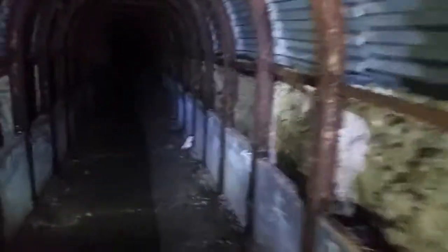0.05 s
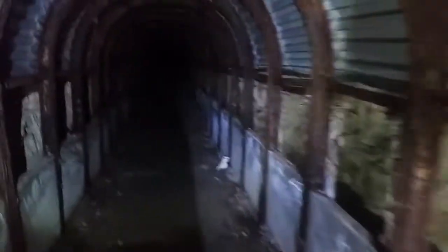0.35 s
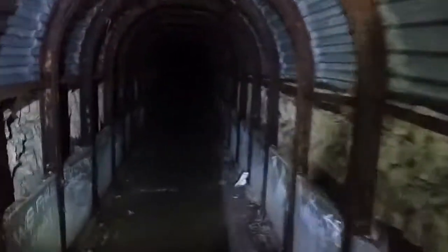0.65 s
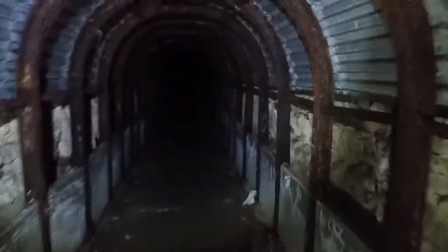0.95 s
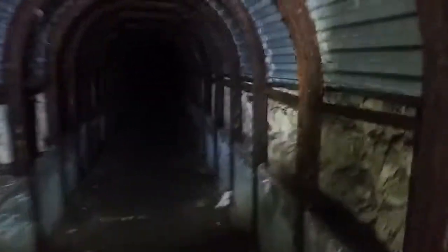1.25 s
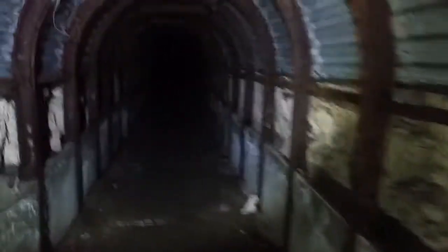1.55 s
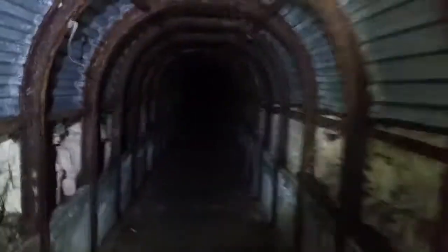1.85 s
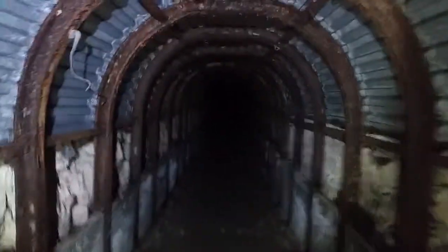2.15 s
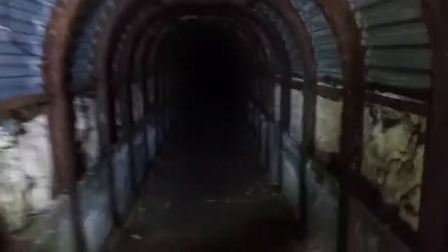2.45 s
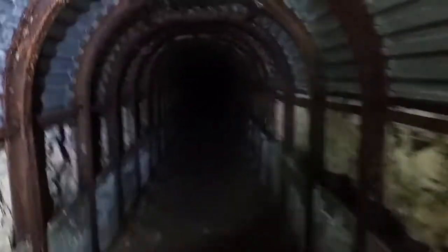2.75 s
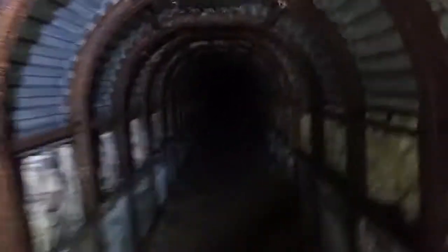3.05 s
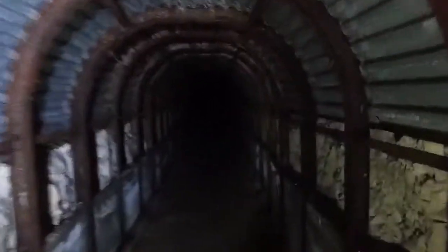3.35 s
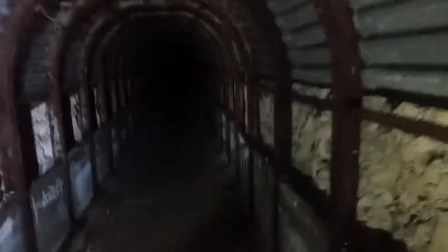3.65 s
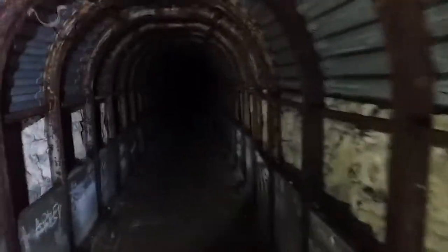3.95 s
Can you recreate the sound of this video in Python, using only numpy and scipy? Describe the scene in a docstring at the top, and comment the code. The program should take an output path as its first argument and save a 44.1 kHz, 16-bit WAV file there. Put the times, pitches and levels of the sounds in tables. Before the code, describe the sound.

Footsteps go at an even pace along a narrow tunnel, each a hollow thud with a soft crunch of grit and an echo. Small stones click and metal clinks faintly on the right, over low rumble and microphone hiss.

```python
"""Footsteps at an even pace on the damp, gritty floor of a narrow tunnel.
Each step: a hollow thud (damped modes) in crunching grit (filtered clicks), with tunnel echo.
Small stones click and metal clinks on the right; the walker's hand bumps a camera.
Underneath: a low drone climbing slowly like a far engine, air rumble, microphone hiss."""
import sys
import numpy as np
from scipy import signal
from scipy.fft import rfft, irfft
from scipy.io import wavfile
from scipy.ndimage import uniform_filter1d

SR = 44100
rng = np.random.default_rng(int(sys.argv[2]) if len(sys.argv) > 2 else 0)


def digitize_waveform(pressure):
    """Quantize a signal to 16-bit integers and store it at the path in sys.argv[1].

    Rows of a 2-D input are taken as channels; values are limited to [-1, 1].
    """
    field = np.atleast_2d(pressure).T
    bounded = np.clip(field, -1, 1)
    quanta = np.round(bounded * 32767).astype(np.int16)
    wavfile.write(sys.argv[1], SR, quanta)


N = 176400

# microphone hiss spectrum: f/Hz, left/dB, right/dB
HISS_SPECTRUM = [(490, -1.5, 2.5), (2090, -11.5, -8), (3180, -10.5, -6.5), (3480, -5, 5.5),
                 (3774, -4.5, 11), (4630, -9, 0), (5200, -23, -31), (6840, -35, -39), (8400, -31, -14),
                 (10600, -25, -17), (14200, -14.5, -14)]
# treble hiss envelope: t/s, gain/dB
HISS_ENVELOPE = [(0.2, 0.5), (1.6, -8), (2.8, -4), (3.9, 1)]
HISS_DB, HISS_SPLIT_HZ, HISS_LOW_SHARE = -64.5, 7000, 0.41
# air rumble spectrum: f/Hz, level/dB
RUMBLE_SPECTRUM = [(15, -57), (27, 5), (37, 3.5), (52, 4.5), (85, -2), (130, -10.5), (200, -21),
                   (300, -20.5), (500, -29), (900, -39), (2000, -45.5), (5000, -60)]
# air rumble envelope: t/s, level/dB
RUMBLE_ENVELOPE = [(0, -38), (0.35, -47.5), (1.3, -48.5), (1.65, -53.5), (2.501, -49.5), (2.801, -55),
                   (3.101, -48.5), (3.35, -51), (4, -46)]
RUMBLE_SIDE_DB, RUMBLE_PAN_DB = -5.5, -1
# drone glide: t/s, f/Hz, fundamental/dB, octave/dB
DRONE_GLIDE = [(0, 31.93, -71, -47.5), (0.55, 34.25, -87, -43), (1.0, 35.95, -68, -51),
               (1.298, 39.06, -59.5, -49), (2.002, 45.83, -54, -57.5), (2.648, 50.02, -54, -52),
               (3.151, 50.5, -56, -56.5), (3.951, 55.44, -42, -68.5)]
DRONE_PAN_DB = -1.5
# tunnel decay: f/Hz, t60/s
TUNNEL_DECAY = [(100, 1.9), (300, 0.47), (1000, 1), (8000, 0.77), (15000, 0.41)]
TUNNEL_ONSET_S, EARLY_S, EARLY_DB, TUNNEL_PAN_DB, TREBLE_PAN_DB = 0.013, 0.081, 12, -1, -13

# hand bumps: t/s, level/dB
HAND_BUMPS = [(0.052, -47), (0.151, -42.5), (0.19, -41)]
# modes of the bumped camera: f/Hz, level/dB, t60/s
CAMERA_MODES = [(168, -4, 0.11), (221, -3, 0.069)]
# metal clinks: t/s, f/Hz, level/dB, t60/s, mode spread/fraction of f
METAL_CLINKS = [(0.095, 8640, -54.5, 0.11, .1), (0.821, 12100, -61, 0.075, .028),
                (3.311, 11900, -70, 0.07, .055)]
CLINK_PAN_DB = -20
# stone clicks: t/s, ring f/Hz, ring/dB, knock/dB, snap/dB
STONE_CLICKS = [(0.095, 3900, -55, -59.5, -58.5), (0.401, 13000, -64, -58, -56),
                (1.277, 1654, -49.5, -75, -54.5), (1.375, 2700, -57.5, -52.5, -57),
                (3.015, 1200, -54, -81, -66.5), (3.64, 9300, -60.5, -65.5, -72)]
# stone knock spectrum: f/Hz, level/dB
KNOCK_SPECTRUM = [(200, -45), (600, 2.5), (1100, -11.5), (2000, -7), (4000, -8), (6500, -33)]
STONE_HOLD_S, STONE_FALL_S, STONE_BAND_RATIO, SNAP_TOP_HZ = .007, .004, 1.25, 11600
STONE_PAN_DB, STONE_WET_DB = -22, -6.5
# single grains cracking: t/s, level/dB
GRAIN_TICKS = [(0.298, -71), (0.548, -55.5), (1.444, -66), (2.892, -69), (3.416, -71)]
TICK_FALL_S = .004

# sole scuffs: peak t/s, rise/s, fall/s, scrape/dB, scrape f/Hz, grit/dB
SOLE_SCUFFS = [(0.469, 0.03, 0.057, -55.5, 1650, -69), (0.549, 0.034, 0.04, -61, 2140, -64),
               (0.64, 0.043, 0.17, -68, 2400, -80.5), (1.193, 0.053, 0.039, -59.5, 1870, -66.5),
               (1.29, 0.02, 0.1, -64, 1960, -73), (1.741, 0.024, 0.34, -63, 424, -83.5),
               (1.878, 0.021, 0.013, -59.5, 695, -69.5), (2.03, 0.05, 0.081, -63.5, 370.6, -96),
               (2.29, 0.00073, 0.056, -62.5, 1790, -76.5), (2.316, 0.012, 0.023, -56, 850, -69.5),
               (2.429, 0.013, 0.018, -59.5, 2980, -73), (2.502, 0.05, 0.081, -63, 1960, -75),
               (2.911, 0.015, 0.021, -65.5, 2500, -81.5), (2.979, 0.0019, 0.015, -58.5, 2950, -74),
               (3.031, 0.022, 0.041, -54.5, 1330, -68.5), (3.117, 0.032, 0.039, -53, 617.8, -70.5),
               (3.642, 0.0067, 0.04, -64, 1780, -63.5), (3.679, 0.014, 0.034, -49, 452, -76)]
# coarse scrape spectrum: f/Hz, level/dB
SCRAPE_SPECTRUM = [(200, 13.5), (350, 9.5), (700, 2), (1700, -7.5), (3800, -13), (5000, -31), (6500, -48)]
# fine grit spectrum: f/Hz, level/dB
GRIT_SPECTRUM = [(1500, -22.5), (4000, 0), (5500, -18.5), (7000, -14.5), (8600, -1.5), (10500, -4),
                 (13000, -9.5), (15500, -13)]
GRAINS_PER_S, GRAIN_SPREAD_DB, SPURT_S, SPURT_DB = 3200, 1.5, .008, 2.2
RUB_PEAK_DB, RUB_WIDTH_OCT, RUB_LOW_CUT_RATIO = 10, 0.38, 0.14
SCRAPE_PAN_DB, GRIT_PAN_DB, SCUFF_WET_DB = -16, -27, -1
# heel and sole landings: t/s, level/dB, f/Hz, hardness (upper mode gain)/dB
FOOTFALLS = [(0.524, -36, 291.5, -3.5), (0.596, -41.5, 307, -12), (1.135, -49, 284, 9),
             (1.153, -32, 288, -27), (1.183, -45.5, 309.5, 1.5), (1.732, -46, 292, -7),
             (1.849, -37, 262, -11), (1.858, -40.5, 281.3, 2), (2.012, -46.5, 305, -5.5),
             (2.289, -54, 286, 5.5), (2.518, -35, 294.7, -10), (2.977, -46.5, 298.3, -4),
             (3.027, -43.5, 299, -1.5), (3.076, -38, 294, 1.5), (3.091, -42, 277, 5.5),
             (3.567, -43.5, 287.6, 0), (3.576, -44, 195, 1), (3.664, -33, 340, -12.5),
             (3.684, -44.5, 202.4, 2.5)]
# footfall modes: ratio to f, level/dB, t60/s
FOOTFALL_MODES = [(0.998, 3, 0.066), (1.264, 4, 0.036), (1.6, -5, 0.068), (1.902, -4, 0.076),
                  (2.55, -6.5, 0.054)]
THUD_ATTACK_S, THUD_PAN_DB, THUD_WET_DB, THUD_LEFT_LAG_S = 0.0035, -4.5, -4, 0.00033
TOP_HZ = 15600


def undb(db):
    """dB to gain."""
    return 10 ** (np.asarray(db) / 20)


def unit(x):
    """Scale to rms 1."""
    return x / np.sqrt(np.mean(x ** 2))


def pan(x, db):
    """Pan by left minus right level."""
    gains = undb(np.array([[db], [-db]]) / 2)
    return x * gains / gains.mean()


def log_curve(points, f):
    """Interpolate (f/Hz, value) points over log frequency."""
    hz, values = np.array(points, float).T
    return np.interp(np.log(f + 1e-9), np.log(hz), values)


def time_curve(points, column=1):
    """Interpolate a column over t/s, per sample."""
    table = np.array(points)
    return np.interp(np.arange(N) / SR, table[:, 0], table[:, column])


def colour(x, spectrum):
    """Filter by (f/Hz, level/dB) points; rms 1."""
    gain = undb(log_curve(spectrum, np.fft.rfftfreq(N, 1 / SR)))
    return unit(irfft(rfft(x) * gain, N))


def since(start_s):
    """Seconds since start_s, zero before."""
    return np.maximum(np.arange(N) / SR - start_s, 0)


def burst(start_s, fall_s, hold_s=0):
    """Envelope: step on, hold, exponential fall."""
    return (since(start_s) > 0) * np.exp(-np.minimum(since(start_s + hold_s) / fall_s, 20))


def ring(start_s, modes):
    """Struck modes (f/Hz, level/dB, t60/s), alternating in sign."""
    out, i = np.zeros(N), int(start_s * SR)
    t = np.arange(min(SR // 2, N - i)) / SR
    for k, (hz, db, t60_s) in enumerate(modes):
        out[i:i + len(t)] += (-1) ** k * undb(db - 60 * t / t60_s) * np.sin(2 * np.pi * hz * t)
    return out


def grains():
    """Dense random clicks of uneven size."""
    hit = rng.random(N) < GRAINS_PER_S / SR
    return hit * rng.choice([-1, 1], N) * undb(GRAIN_SPREAD_DB * np.minimum(rng.exponential(size=N), 4))


def hiss():
    """Microphone hiss, bright band on the right; sinks and returns, most in the treble."""
    f, table = np.fft.rfftfreq(N, 1 / SR), np.array(HISS_SPECTRUM)
    gain = undb([log_curve(table[:, [0, side]], f) for side in (1, 2)])
    noise = undb(HISS_DB) * unit(irfft(rfft(rng.standard_normal((2, N))) * gain, N))
    treble = irfft(rfft(noise) * (f > HISS_SPLIT_HZ), N)
    treble_db = time_curve(HISS_ENVELOPE)
    return (noise - treble) * undb(HISS_LOW_SHARE * treble_db) + treble * undb(treble_db)


def rumble():
    """Tunnel air: low noise, similar on both sides."""
    mid, side = (colour(rng.standard_normal(N), RUMBLE_SPECTRUM) for _ in range(2))
    stereo = mid + undb(RUMBLE_SIDE_DB) * side * np.array([[1], [-1]])
    return pan(undb(time_curve(RUMBLE_ENVELOPE)) * stereo, RUMBLE_PAN_DB)


def drone():
    """Rising tone plus octave; weight shifts from octave to fundamental."""
    hz, fundamental_db, octave_db = (time_curve(DRONE_GLIDE, column) for column in (1, 2, 3))
    phase = 2 * np.pi * (np.cumsum(hz) / SR + rng.random())
    return np.sqrt(2) * (undb(fundamental_db) * np.sin(phase) + undb(octave_db) * np.sin(2 * phase))


def tunnel(x):
    """Dense early echoes off near walls, then a tail: bass longest, treble to the right."""
    t, f = np.arange(SR) / SR, np.fft.rfftfreq(SR, 1 / SR)
    noise, response = rfft(rng.standard_normal((2, SR))), 0
    onset = np.minimum(t / TUNNEL_ONSET_S, 1) ** 2
    early = 1 + undb(EARLY_DB) * np.exp(-t / EARLY_S)
    for hz in 125 * 2. ** np.arange(8):
        distance_oct = np.abs(np.log2((f + 1e-9) / hz))
        band = irfft(noise * np.maximum(1 - distance_oct, 0), SR)
        fade = onset * early * np.exp(-np.log(1000) * t / log_curve(TUNNEL_DECAY, hz))
        pan_db = log_curve([(400, TUNNEL_PAN_DB), (8000, TREBLE_PAN_DB)], hz)
        response += pan(band * fade / np.sqrt(np.sum(fade ** 2)), pan_db)
    return signal.fftconvolve(x[None], response, axes=1)[:, :N]


def bumps():
    """Hand shifts on the camera: dull bumps."""
    return sum(undb(db) * ring(start_s, CAMERA_MODES) for start_s, db in HAND_BUMPS)


def clinks(mode_count=10):
    """Small carried metal parts touch: brief clusters of close modes."""
    out = 0
    for start_s, hz, db, t60_s, spread in METAL_CLINKS:
        offsets = 2 * (np.arange(mode_count) + rng.random(mode_count)) / mode_count - 1
        modes = [(hz * (1 + spread * offset), db - 6 * offset ** 2, t60_s) for offset in offsets]
        out += ring(start_s, modes) / np.sqrt(mode_count / 2)
    return out


def stones():
    """Stones slip and rattle: band-limited ring, broad knock, bright snap."""
    out, knock, snap = 0, colour(grains(), KNOCK_SPECTRUM), colour(grains(), GRIT_SPECTRUM)
    snap = signal.sosfilt(signal.butter(2, SNAP_TOP_HZ, fs=SR, output="sos"), snap)
    for start_s, hz, *levels_db in STONE_CLICKS:
        band_hz = [hz / STONE_BAND_RATIO, hz * STONE_BAND_RATIO]
        tone = signal.sosfilt(signal.butter(2, band_hz, "band", fs=SR, output="sos"), grains())
        envelope = burst(start_s, STONE_FALL_S, STONE_HOLD_S)
        for part, db in zip((tone, knock, snap), levels_db):
            out += undb(db) * unit(envelope * part) * np.sqrt(np.mean(envelope ** 2))
    return out


def ticks():
    """Single grains crack: tiny bright noise bursts."""
    envelope = sum(undb(db) * burst(start_s, TICK_FALL_S) for start_s, db in GRAIN_TICKS)
    return envelope * colour(rng.standard_normal(N), GRIT_SPECTRUM)


def spurts():
    """Grit gives way unevenly: random gain, rms 1."""
    flutter = unit(uniform_filter1d(rng.standard_normal(N), int(SPURT_S * SR)))
    return unit(undb(SPURT_DB * flutter))


def scuffs():
    """Grit shifts under the sole: resonant scrape and fine crunch swell and fade together."""
    t, f = np.arange(N) / SR, np.fft.rfftfreq(N, 1 / SR)
    spectrum = rfft(colour(grains(), SCRAPE_SPECTRUM))
    scrape, grit_envelope = 0, 0
    for peak_s, rise_s, fall_s, scrape_db, hz, grit_db in SOLE_SCUFFS:
        lead_in = (np.minimum(t - peak_s, 0) / rise_s) ** 2
        swell = np.exp(-np.minimum(lead_in + since(peak_s) / fall_s, 20))
        resonance = undb(RUB_PEAK_DB * np.exp(-(np.log2((f + 1) / hz) / RUB_WIDTH_OCT) ** 2))
        low_cut = f / np.hypot(f, RUB_LOW_CUT_RATIO * hz)
        scrape += undb(scrape_db) * swell * unit(irfft(spectrum * resonance * low_cut, N))
        grit_envelope += undb(grit_db) * swell
    crunch = spurts()
    return crunch * scrape, crunch * grit_envelope * colour(grains(), GRIT_SPECTRUM)


def thuds():
    """Shoe lands with a hollow knock; harder landings lift the upper modes."""
    out = 0
    for start_s, db, hz, hardness_db in FOOTFALLS:
        detune = 1 + 0.026 * rng.standard_normal(len(FOOTFALL_MODES))
        modes = [(hz * ratio * detune[k], db + mode_db + hardness_db * (k > 0), t60_s)
                 for k, (ratio, mode_db, t60_s) in enumerate(FOOTFALL_MODES)]
        attack = 1 - np.exp(-since(start_s) / THUD_ATTACK_S)
        out += ring(start_s, modes) * attack
    return out


def scene():
    """Stereo mix: walker, tunnel echo, background."""
    thud, (scrape, grit), stone, clink = thuds(), scuffs(), stones(), clinks()
    thud_stereo = np.array([np.roll(thud, int(THUD_LEFT_LAG_S * SR)), thud])
    direct = (pan(thud_stereo, THUD_PAN_DB) + pan(scrape, SCRAPE_PAN_DB)
              + pan(grit + ticks(), GRIT_PAN_DB) + pan(stone, STONE_PAN_DB) + pan(clink, CLINK_PAN_DB))
    echo = tunnel(undb(THUD_WET_DB) * thud + undb(SCUFF_WET_DB) * (scrape + grit)
                  + undb(STONE_WET_DB) * (stone + clink))
    return direct + echo + pan(drone(), DRONE_PAN_DB) + bumps() + rumble() + hiss()


def record(dry):
    """Camera's steep low-pass."""
    return signal.sosfilt(signal.ellip(10, .2, 70, TOP_HZ, fs=SR, output="sos"), dry)


dry = scene()
out = record(dry)
digitize_waveform(out)
```